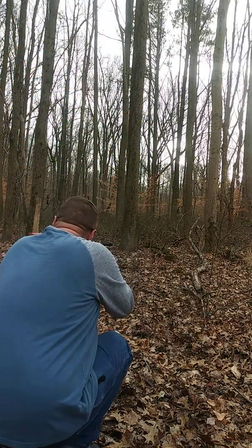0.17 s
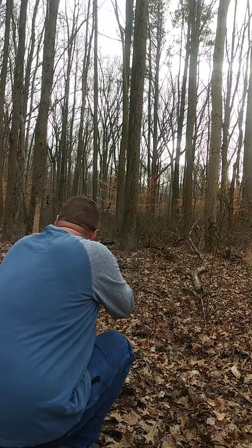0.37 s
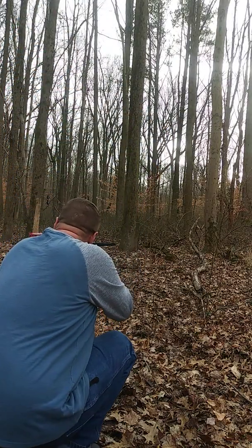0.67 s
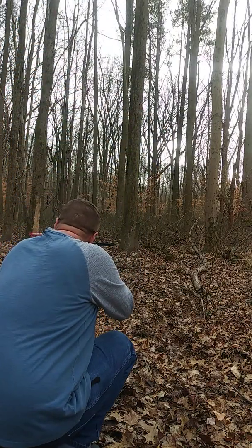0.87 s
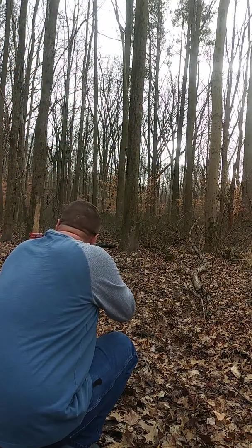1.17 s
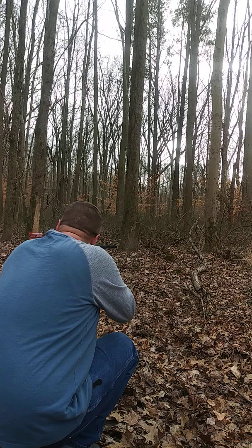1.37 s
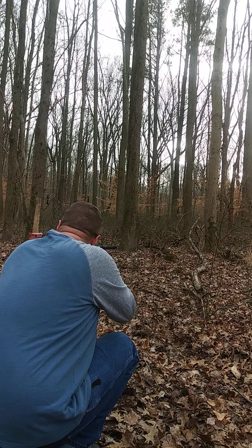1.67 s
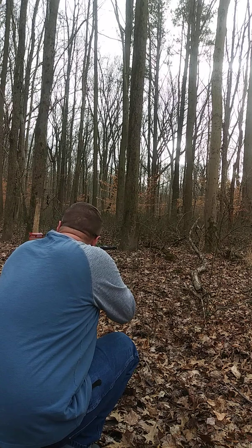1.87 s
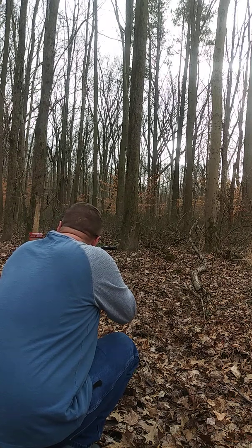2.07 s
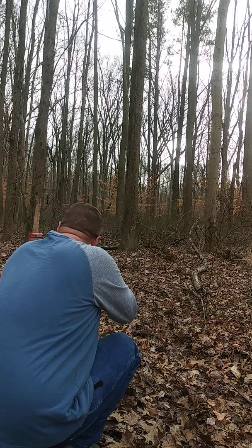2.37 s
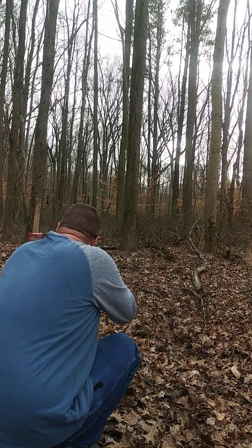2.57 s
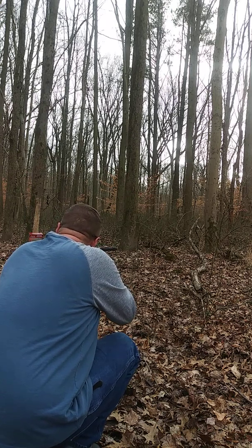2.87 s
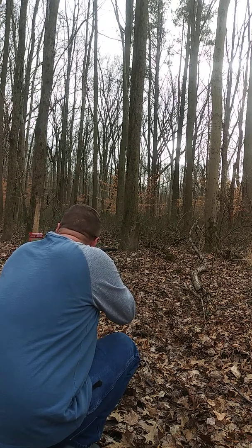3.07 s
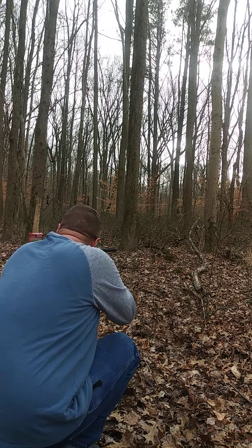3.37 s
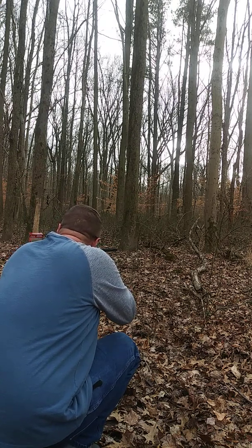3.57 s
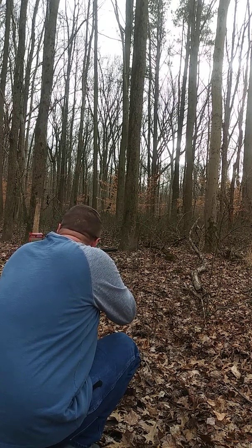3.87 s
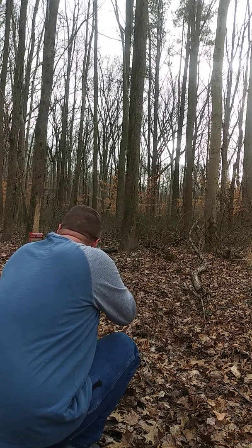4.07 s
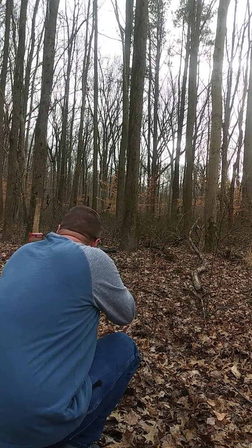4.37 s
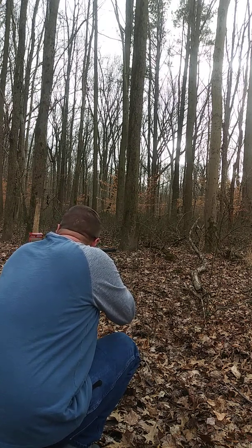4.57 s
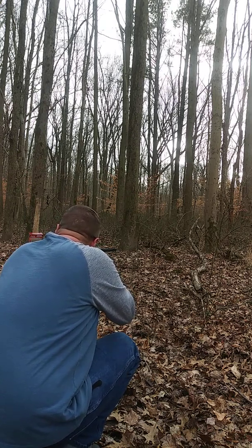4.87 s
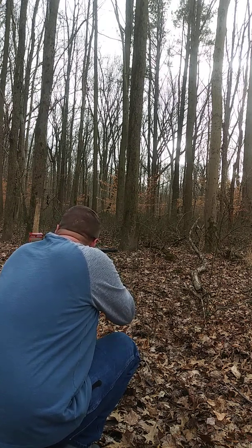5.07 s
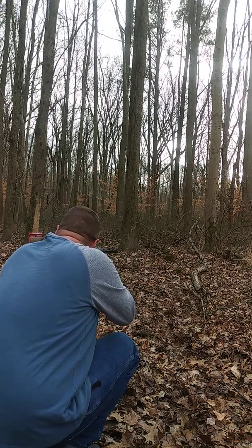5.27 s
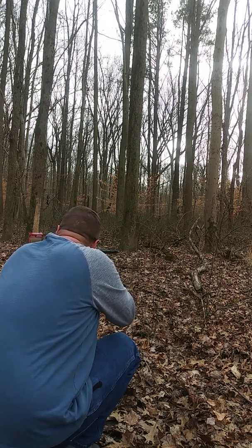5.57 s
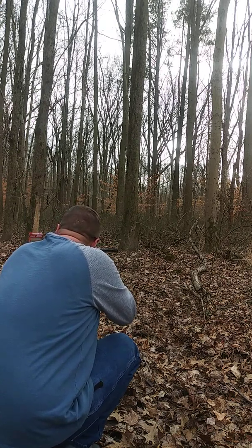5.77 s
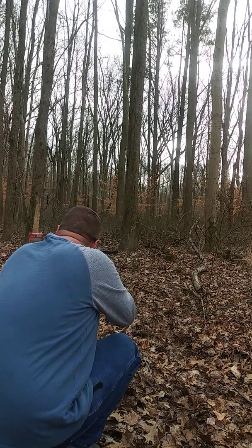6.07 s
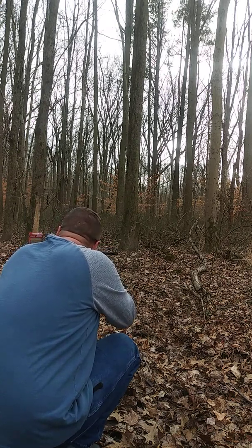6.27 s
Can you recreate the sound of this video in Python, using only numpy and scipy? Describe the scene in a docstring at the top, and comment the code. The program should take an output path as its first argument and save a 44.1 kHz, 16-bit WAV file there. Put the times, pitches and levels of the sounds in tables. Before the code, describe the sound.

A very quiet outdoor scene in bare woods, with a faint, smooth drone of a distant road throughout, mostly in the midrange around one kilohertz. Between about 0.2 and 0.9 seconds a small bird gives barely audible, blurred high lisps. Little else happens until a distant bird hoots twice, short soft near-pure notes around 1.2 kilohertz, at 4.4 and 4.7 seconds. At 5.1 a crossbow a few steps away releases: latch click, explosive bright metallic snap, woody knock and dense rattle, all over in some 50 milliseconds. At 5.23 the bolt strikes a nearby target with a hard crack and short, duller thud. Both blows scatter from the trunks as a noisy tail, highs dying first, fading over roughly a second. A very faint low thud returns near 5.57, a leaf ticks at 5.9, and quiet hum remains.

```python
"""A crossbow is shot a few steps away in bare woods: the latch lets go, the string slams home, the bow rattles.
The bolt thuds into a target close by. Struck parts are banks of ringing modes; the rattle is random grains.
The trunks scatter both blows back as noise that dies band by band, and a leaf ticks afterwards.
A far road drones underneath as coloured noise; a small bird lisps in blurred gliding whistles
and a distant one hoots twice in near-sine notes."""
import sys
import numpy as np
from scipy import signal
from scipy.fft import rfft, irfft, next_fast_len
from scipy.io import wavfile

SR = 44100
rng = np.random.default_rng(int(sys.argv[2]) if len(sys.argv) > 2 else 0)


def wrap_up_sound(samples):
    """Save the sound to the file named by the first command line argument, as 16-bit audio."""
    columns = np.atleast_2d(samples).T
    # keep every value between -1 and 1, then stretch to whole-number steps
    tamed = np.clip(columns, -1, 1)
    steps = np.round(tamed * 32767).astype(np.int16)
    wavfile.write(sys.argv[1], SR, steps)


N = 283607

# Colour of the far road: (frequency [Hz], relative level [dB])
ROAD_COLOUR = [(15, -58), (25, -33.5), (82, -32.5), (145, -26), (249, -16), (373, -11.5), (451, -7.5),
               (818, 0.5), (988, 1), (1840, -12), (3620, -19.5), (4370, -18), (7710, -24), (14800, -27.5),
               (16000, -27.5)]
# Brief swells at the low end of the drone: (middle [s], half-width [s], peak level [dB])
LOW_SWELLS = [(.28, .15, -74.5), (3.1, .12, -75), (3.6, 0.54, -80)]
ROAD_DB = -59

# The small bird's notes: (start [s], length [s], first pitch [Hz], last pitch [Hz], level [dB])
LISPS = [(.23, .12, 8100, 8350, -78), (.24, .09, 6500, 6350, -79), (.72, .06, 7800, 7400, -74),
         (.77, 0.075, 6450, 6940, -70), (.85, .045, 6700, 6250, -72)]
LISP_WIDTH_HZ, LISP_FADE_S = 600, 0.022

# The distant bird's notes: (start [s], length [s], starting pitch [Hz], level [dB])
HOOTS = [(4.445, .115, 1197, -61.5), (4.67, .065, 1180, -62.5)]
HOOT_SAG_HZ_PER_S, HOOT_FADE_S = 60, 0.012

# Contacts on the bow, from latch over slam to rebounds:
# (time [s], crack in the metal [dB], knock in the stock [dB], hardness of the crack [dB per octave])
BOW_BLOWS = [(5.0944, -16, -12, -3.5), (5.0997, -5.5, -27.5, -6), (5.1014, -21, -14, 1.5),
             (5.106, -16.5, -18.5, -4), (5.112, -17, -25, -6), (5.1228, -19, -25, -5)]
# Ringing of the bow's metal: (frequency [Hz], level [dB], t60 [s])
METAL_MODES = [(4360, -9.5, 0.00604), (5940, -2, 0.0034), (6800, -4, .007), (7900, -3.5, 0.009),
               (10700, -5.5, 0.0034), (13500, -8.5, .003)]
# Ringing of the stock: (frequency [Hz], level [dB], t60 [s])
STOCK_MODES = [(325, -16.5, 0.042), (440.6, -28.5, 0.23), (581, -11, .04), (820, -14, 0.029),
               (942, -20.5, 0.091), (1200, -8, 0.0078), (1590, -11.5, 0.017), (1810, -13.5, .02),
               (2238, -12.5, 0.035), (2700, -16.5, 0.013), (3310, -31.5, .06)]
# Colour of the rattle: (frequency [Hz], relative level [dB])
RATTLE_COLOUR = [(300, -30), (700, -14), (1500, -1.5), (3130, -3.5), (4500, 2.5), (6850, 3), (8800, -0.5),
                 (11700, -11), (16000, -28.5)]
BOW_LOW_HZ = 280  # low cut on the cracks, knocks and rattle of the bow
# Each contact judders twice more: spacing, its unevenness as a fraction, level change per judder
JUDDER_S, JUDDER_SPREAD, JUDDER_CRACK_DB, JUDDER_KNOCK_DB = 0.0011, 0.25, -8.5, -1.5
RATTLE_PER_S = 11000  # mean number of grains
RATTLE_START_S, RATTLE_STOP_S, RATTLE_RISE_S, RATTLE_FALL_S = 5.1, 5.138, 0.002, 0.007
# Steady level, then the extra level at the start and how fast that extra dies
RATTLE_DB, RATTLE_BURST_DB, RATTLE_BURST_S = -27.5, 11.5, 0.004

# Decay of the scatter between the trunks: (frequency [Hz], t60 [s])
WOODS_T60 = [(100, 0.55), (260, 0.83), (700, 2.1), (1840, 1.7), (3000, 1.38), (4600, 1.09), (6000, 0.83),
             (8000, 0.79), (12800, 0.38), (16000, .35)]
# Scatter after each blow: build-up [s], level before build-up and decay [dB],
# then its colour: (frequency [Hz], relative level [dB])
BOW_ECHO = 0.017, -30, [(100, -48.5), (330, -24), (500, -17.5), (930, -16.5), (2200, -11.5), (3120, -10.5),
            (4380, -2.5), (6700, 0.5), (8800, -4.5), (10000, -16.5), (13000, -19), (16000, -29)]
TARGET_ECHO = 0.0016, -40.5, [(100, -16), (150, -8), (190, 9.5), (250, -5), (330, -6), (500, 1), (900, 0.5),
               (1600, -6), (2400, -0.5), (3200, -4.5), (4500, -0.5), (6000, -9), (12000, -17), (16000, -30)]
BOW_ECHO_S, TARGET_ECHO_S = 5.1, 5.246
# Extra loss reached after one second, growing ever faster with time; unevenness from clumps of trunks
WOODS_EDGE_DB, WOODS_LUMPS_DB = 17.5, 1.5

# Bolt into the target: (time [s], tip crack [dB], block thud [dB], hardness of the crack [dB per octave])
TARGET_BLOWS = [(5.2291, -12, -28, -2.5), (5.23, -16, -25.5, 1), (5.2321, -19, -27, 5),
                (5.234, -23, -24.5, 5.5), (5.2400, -31, -34, -8.5)]
# Ringing of the bolt's tip: (frequency [Hz], level [dB], t60 [s])
TIP_MODES = [(790, -11.5, 0.031), (1285, -5.5, 0.0099), (1530, -3.5, 0.0044), (2280, -4.5, 0.0056),
             (2880, -6.5, 0.0035), (4460, -11, 0.0063), (6560, -12, .004), (8800, -14.5, 0.0019),
             (11800, -26, .003)]
# Ringing of the target block: (frequency [Hz], level [dB], t60 [s])
BLOCK_MODES = [(212, 1, 0.031), (328, 2.5, 0.031), (472, -2.5, 0.039), (648, -5.5, 0.029)]
# One far echo of the thud: (time [s], level [dB])
LATE_THUD = [(5.569, -59)]

# Tick of a leaf: (time [s], level [dB])
LEAF_TICK = [(5.894, -54)]
# Ringing of the leaf: (frequency [Hz], level [dB], t60 [s])
LEAF_MODE = [(5400, 0, .006)]

SHOT_LOW_HZ = 151  # low cut on the shot and its echoes
TOP_STOP_HZ = 16377  # everything above lies at least 60 dB down


def from_db(db):
    """Decibels to gain."""
    return 10 ** (np.asarray(db) / 20)


def rms_one(x):
    """Scale to unit rms."""
    return x / np.sqrt(np.mean(x ** 2) + 1e-20)


def at_hz(points, hz):
    """Read a table on a log-frequency axis."""
    table_hz, values = np.array(points).T
    return np.interp(np.log(hz), np.log(table_hz), values)


def coloured(x, spectrum):
    """Give a signal a spectrum."""
    size = next_fast_len(len(x))
    hz = np.maximum(np.arange(size // 2 + 1) * SR / size, 1)
    return irfft(rfft(x, size) * from_db(at_hz(spectrum, hz)), size)[:len(x)]


def filtered(x, order, hz, kind):
    """Butterworth filter with its corner or corners in Hz."""
    return signal.sosfilt(signal.butter(order, hz, kind, fs=SR, output="sos"), x)


def drift(rate, length=N):
    """Slow chance: random points, rate of them per second, joined by straight lines."""
    count = int(length / SR * rate) + 2
    return np.interp(np.arange(length), np.linspace(0, length, count), rng.standard_normal(count))


def fade(start_s, stop_s, rise_s, fall_s):
    """One between start and stop, with exponential skirts."""
    t = np.arange(N) / SR
    return np.exp(np.minimum(t - start_s, 0) / rise_s - np.maximum(t - stop_s, 0) / fall_s)


def strike(times, levels_db, modes, hardness=0.0):
    """Every blow rings every mode, each a little differently; hard blows favour the high modes."""
    at = np.round(np.array(times) * SR).astype(int)
    out = np.zeros(N)
    luck_db = 2 * rng.standard_normal((len(at), len(modes)))
    pivot_hz = modes[len(modes) // 3][0]
    for k, (hz, mode_db, t60) in enumerate(modes):
        clicks = np.full(N, 1e-18)
        tilt_db = hardness * np.log2(hz / pivot_hz)
        sign = (-1) ** k
        clicks[at] = sign * from_db(levels_db + mode_db + tilt_db + luck_db[:, k])
        # a two-pole resonator rings as a dying sine
        radius = from_db(-60 / (max(t60, 0.001) * SR))
        angle = 2 * np.pi * hz / SR
        out += signal.lfilter([0, np.sin(angle)], [1, -2 * radius * np.cos(angle), radius ** 2], clicks)
    return out


def road():
    """Far traffic and still air: smooth noise that swells a little, most at the low end."""
    t = np.arange(N) / SR
    drone = rms_one(coloured(rng.standard_normal(N), ROAD_COLOUR))
    drone = drone * from_db(ROAD_DB + 0.5 * drift(2.5))
    low = rms_one(filtered(rng.standard_normal(N), 2, [200, 330], "band"))
    swells = sum(from_db(db) * np.exp(-((t - s) / width) ** 2) for s, width, db in LOW_SWELLS)
    return drone + swells * low


def lisping_bird():
    """Gliding whistles, blurred by distance into a narrow band."""
    out, t = np.zeros(N), np.arange(N) / SR
    for s, length, first_hz, last_hz, level_db in LISPS:
        # two slow noises on a cosine and a sine make a narrow band around the gliding pitch
        blur = filtered(rng.standard_normal((2, N)), 2, LISP_WIDTH_HZ / 2, "low")
        pitch_hz = np.interp(t, [s, s + length], [first_hz, last_hz])
        phase = 2 * np.pi * np.cumsum(pitch_hz) / SR
        whistle = rms_one(blur[0] * np.cos(phase) + blur[1] * np.sin(phase))
        out += whistle * from_db(level_db) * fade(s, s + length, LISP_FADE_S, LISP_FADE_S)
    return out


def hooting_bird():
    """Near-sine notes that sag a little and flutter on their way through the trees."""
    out, t = np.zeros(N), np.arange(N) / SR
    for s, length, hz, level_db in HOOTS:
        pitch_hz = hz - HOOT_SAG_HZ_PER_S * (t - s) + 4 * drift(30.8)
        phase = 2 * np.pi * np.cumsum(pitch_hz) / SR
        level = from_db(level_db + 2 * drift(50)) * fade(s, s + length, HOOT_FADE_S, HOOT_FADE_S)
        out += level * np.sqrt(2) * np.sin(phase)
    return out


def bow_rattle():
    """Dense random grains, loudest at the start."""
    burst_db = RATTLE_BURST_DB * fade(RATTLE_START_S, RATTLE_START_S, RATTLE_RISE_S, RATTLE_BURST_S)
    envelope = fade(RATTLE_START_S, RATTLE_STOP_S, RATTLE_RISE_S, RATTLE_FALL_S)
    grains = (rng.random(N) < RATTLE_PER_S / SR) * rng.standard_normal(N)
    return from_db(RATTLE_DB + burst_db) * envelope * rms_one(coloured(grains, RATTLE_COLOUR))


def bow():
    """Metal cracks and stock knocks at each juddering contact, with the rattle on top."""
    first_s, crack_db, knock_db, hardness = np.repeat(BOW_BLOWS, 3, axis=0).T
    judder = np.arange(len(first_s)) % 3
    unevenness = 1 + JUDDER_SPREAD * rng.uniform(-1, 1, len(judder))
    s = first_s + JUDDER_S * judder * unevenness
    crack = strike(s, crack_db + JUDDER_CRACK_DB * judder, METAL_MODES, hardness)
    knock = strike(s, knock_db + JUDDER_KNOCK_DB * judder, STOCK_MODES)
    return filtered(crack + knock + bow_rattle(), 2, BOW_LOW_HZ, "high")


def woods(start_s, rise_s, level_db, colour):
    """Countless small echoes: one second of noise that builds up fast and dies band by band."""
    t = np.arange(SR) / SR
    edges = 60 * 2 ** np.arange(0, 8.4, 0.125)  # eighth-octave bands
    spectrum = rfft(rms_one(coloured(rng.standard_normal(SR), colour)))
    hz = np.arange(SR // 2 + 1)
    echo = np.zeros(SR)
    for low, high in zip(edges, edges[1:]):
        band = irfft(spectrum * (hz >= low) * (hz < high), SR)
        decay_db = -60 * t / at_hz(WOODS_T60, np.sqrt(low * high))
        echo += band * from_db(decay_db + WOODS_LUMPS_DB * drift(50, SR))
    echo *= (1 - np.exp(-t / rise_s)) * from_db(level_db - WOODS_EDGE_DB * t ** 2)
    out, at = np.zeros(N + SR), round(start_s * SR)
    out[at:at + SR] = echo
    return out[:N]


def target():
    """The tip cracks the face, the block thuds as the bolt slows; the thud comes back once from afar."""
    s, crack_db, thud_db, hardness = np.transpose(TARGET_BLOWS)
    crack = strike(s, crack_db, TIP_MODES, hardness)
    thud = strike(s, thud_db, BLOCK_MODES)
    late_thud = strike(*np.transpose(LATE_THUD), BLOCK_MODES[:1])  # lowest mode only
    return crack + thud + late_thud


def leaf():
    """A tick that rings one short high mode."""
    return strike(*np.transpose(LEAF_TICK), LEAF_MODE)


def scene():
    """The shot with its echoes over the quiet woods."""
    background = road() + lisping_bird() + hooting_bird()
    echoes = woods(BOW_ECHO_S, *BOW_ECHO) + woods(TARGET_ECHO_S, *TARGET_ECHO)
    shot = filtered(bow() + target() + echoes, 4, SHOT_LOW_HZ, "high")
    return (background + shot + leaf())[None]


def record(dry):
    """A steep low-pass cuts the top."""
    return signal.sosfilt(signal.cheby2(16, 60, TOP_STOP_HZ, fs=SR, output="sos"), dry)


dry = scene()
out = record(dry)
wrap_up_sound(out)
```